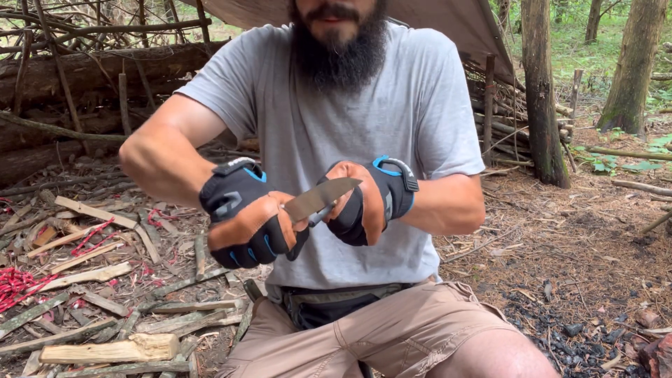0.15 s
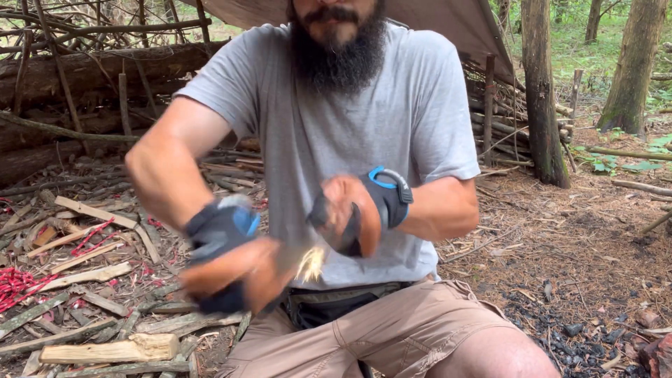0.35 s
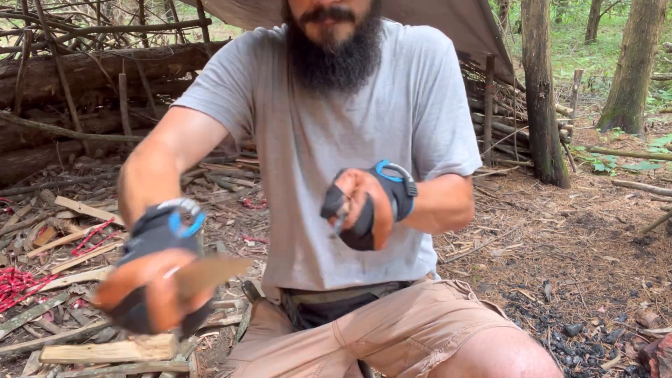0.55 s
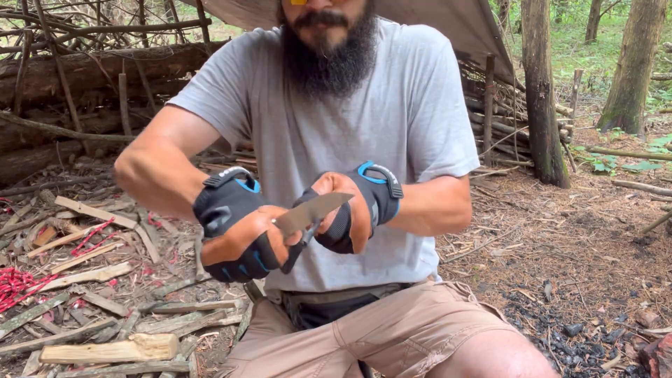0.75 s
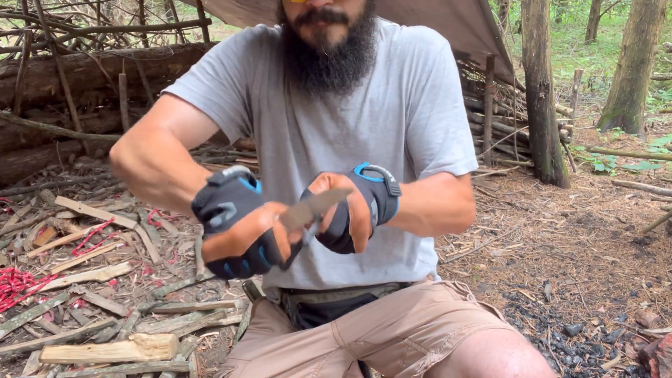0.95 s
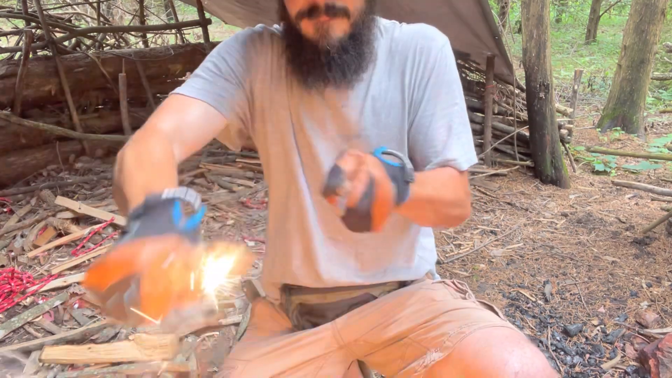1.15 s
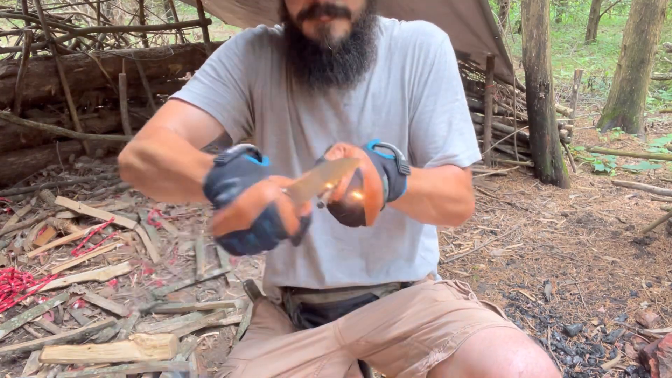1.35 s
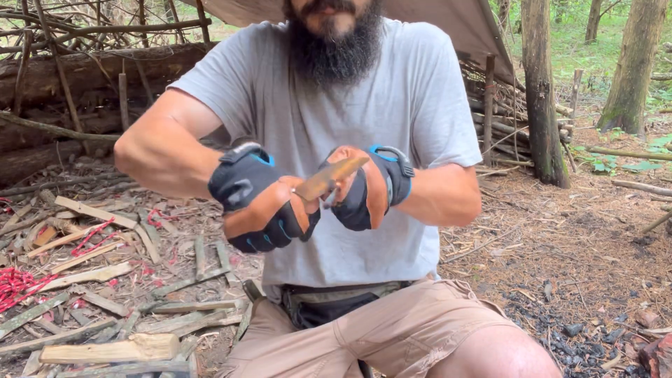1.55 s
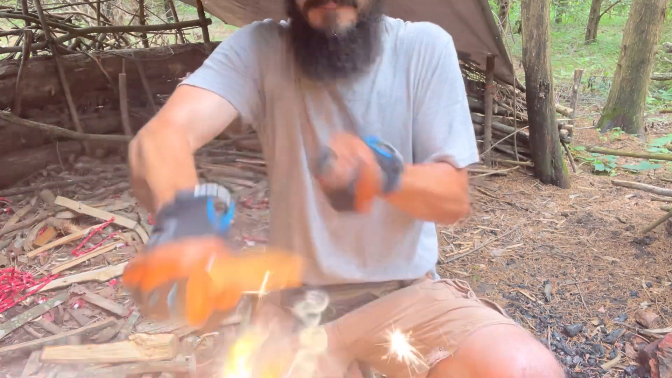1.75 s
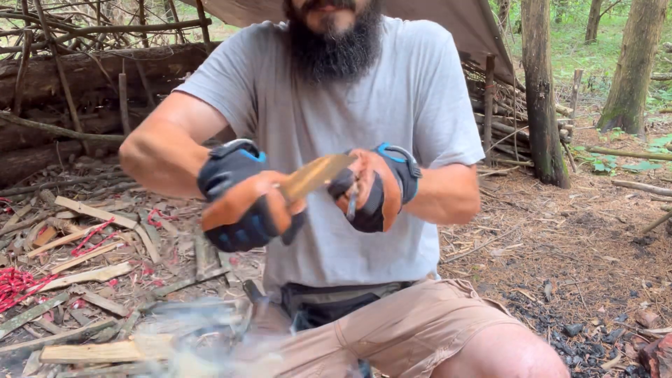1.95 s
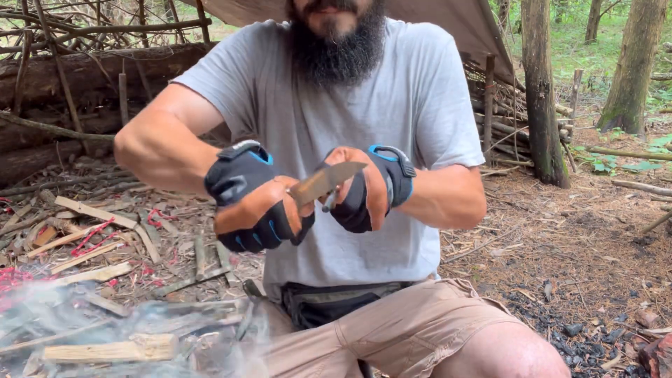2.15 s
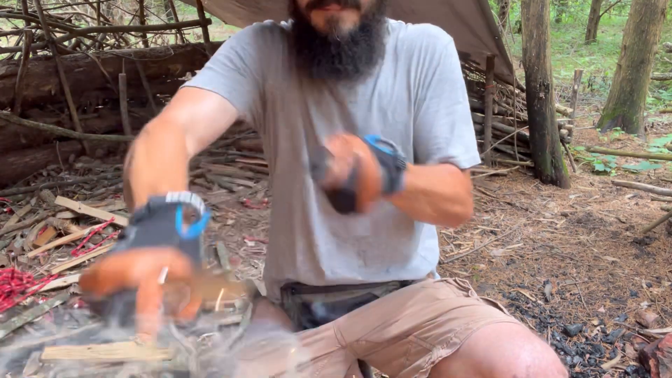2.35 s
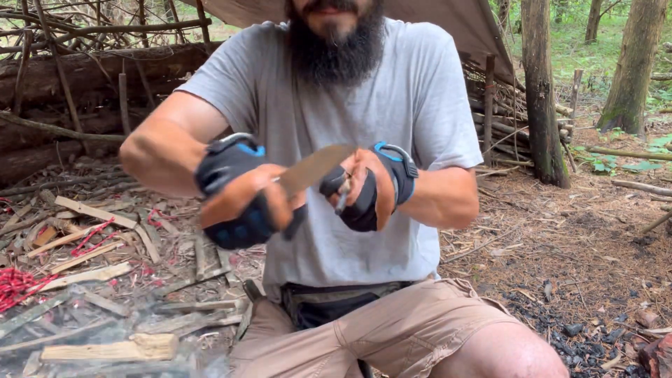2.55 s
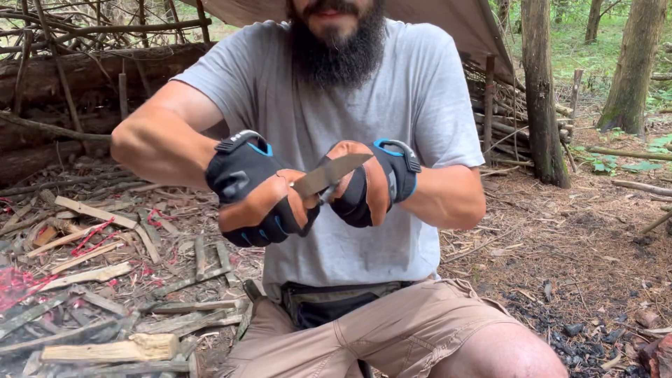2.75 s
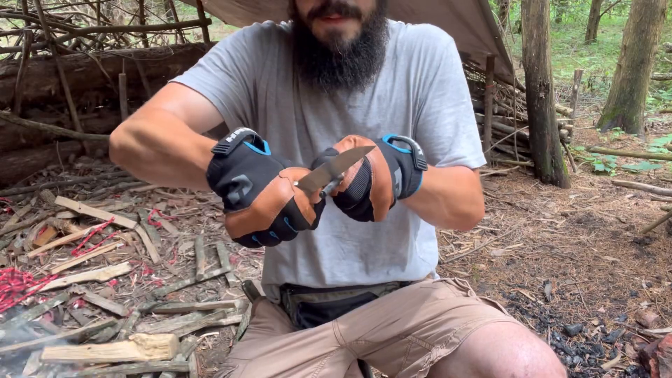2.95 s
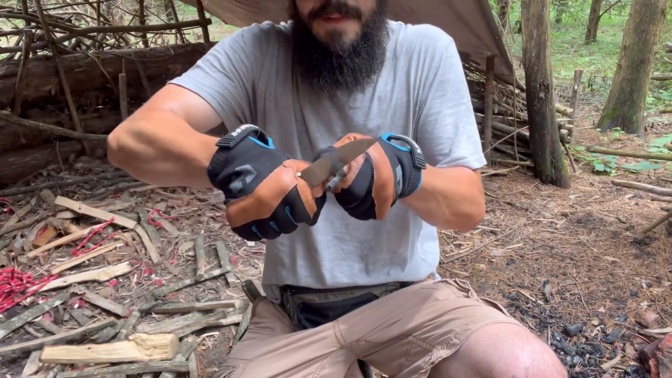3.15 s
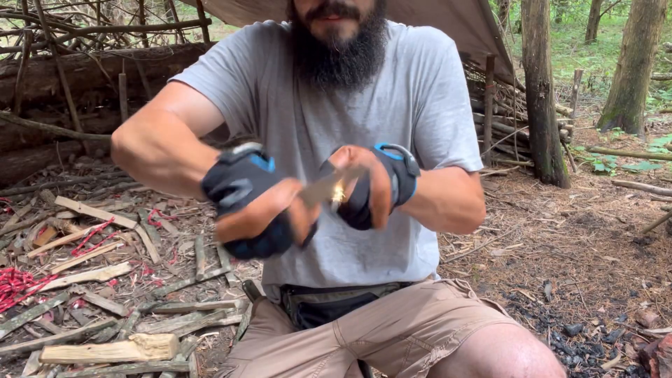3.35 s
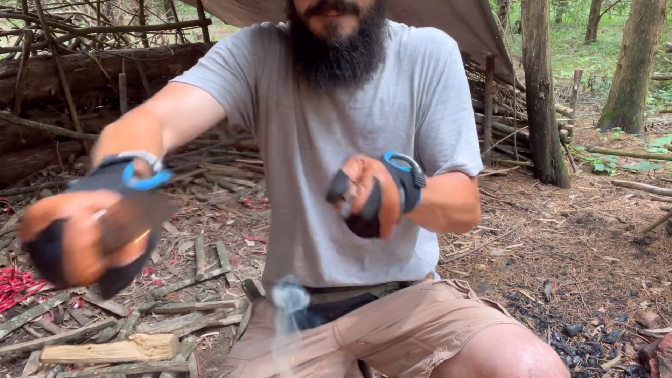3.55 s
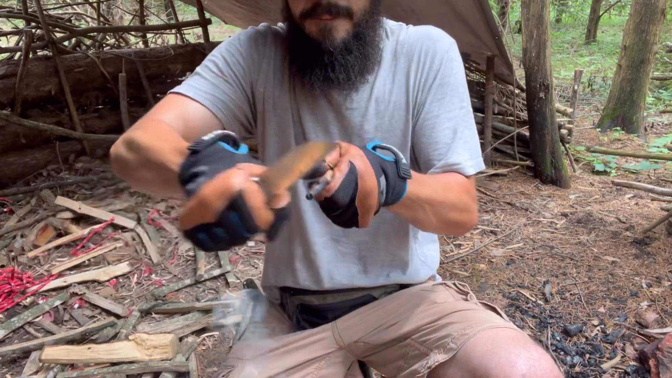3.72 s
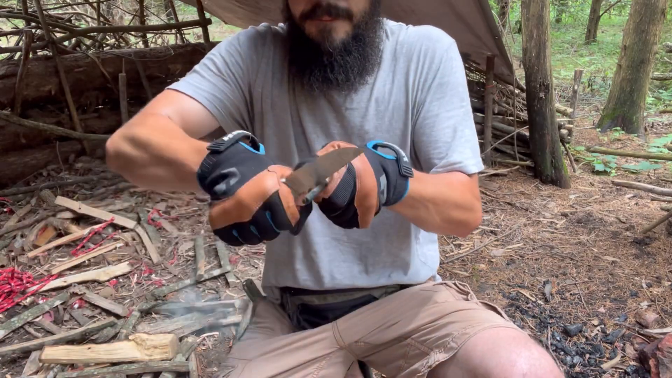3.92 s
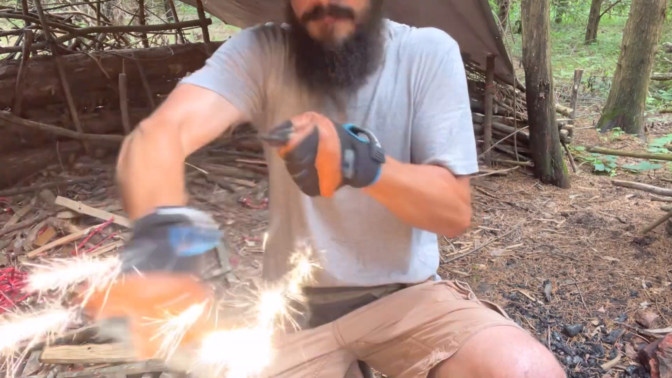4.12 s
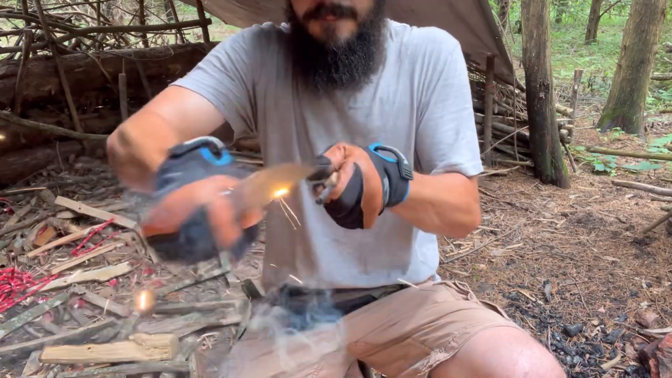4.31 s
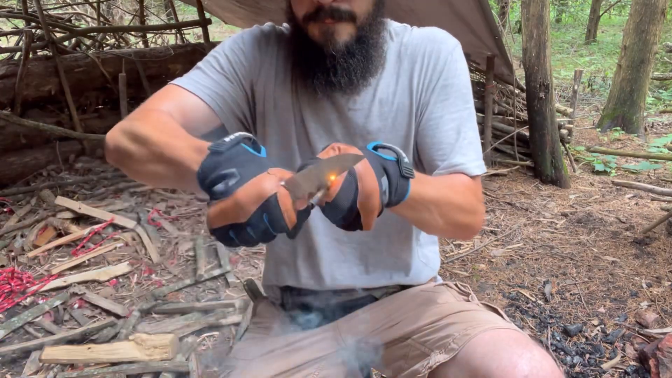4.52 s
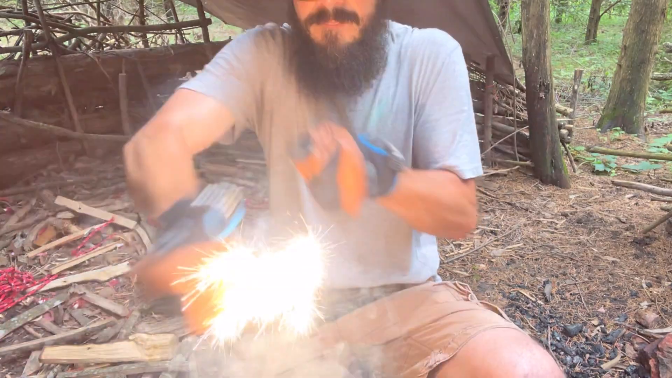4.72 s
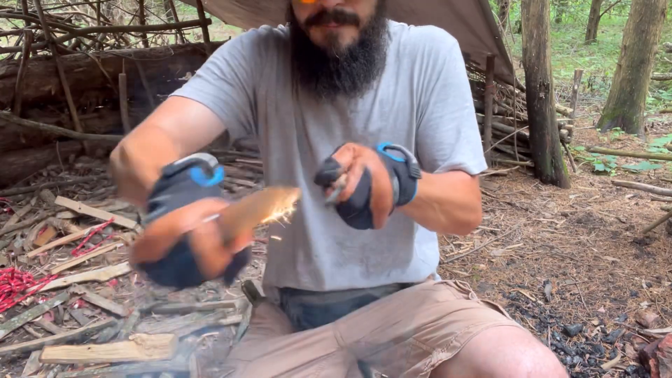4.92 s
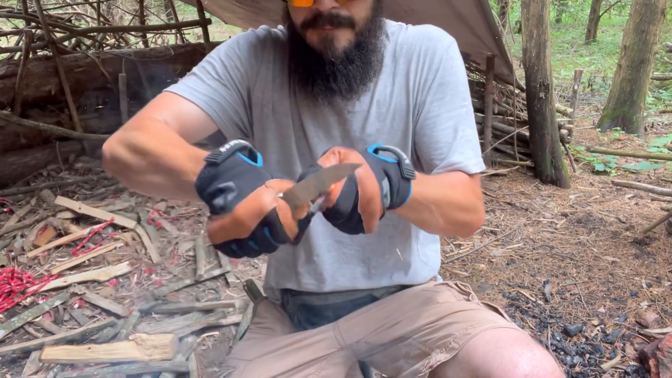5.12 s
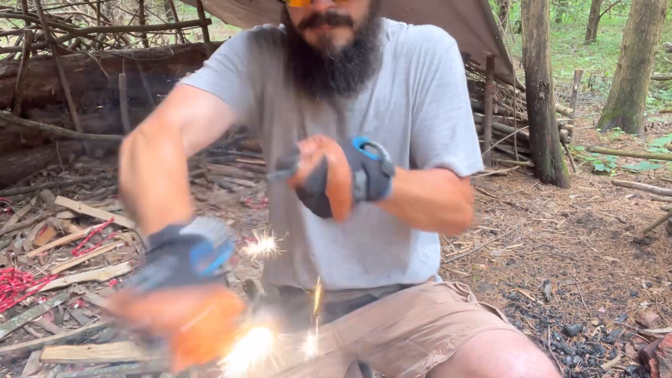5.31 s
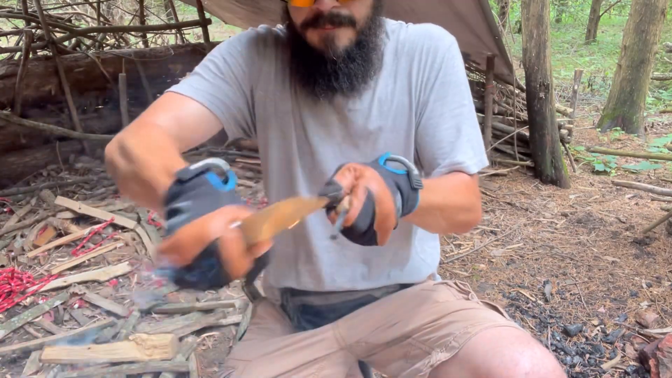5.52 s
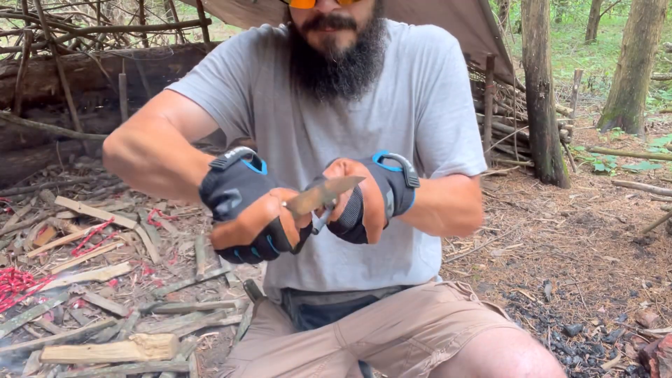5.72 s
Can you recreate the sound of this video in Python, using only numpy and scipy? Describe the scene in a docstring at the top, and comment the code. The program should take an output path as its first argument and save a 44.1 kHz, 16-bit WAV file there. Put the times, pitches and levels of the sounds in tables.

```python
"""In quiet woods, a knife spine is driven down a spark rod again and again, close to a two-port microphone.
Each stroke grinds: grainy noise shakes the blade's resonances, then spiky bursts ring it at the rod's end.
The sparks are shaped noise that flares, hisses and roars, with short pops and low pushed air.
Short clicks tap the knife back onto the rod, and soft noise slides it into place.
Behind it all lie the hush of the trees and a far hum."""
import sys
import numpy as np
from scipy import signal
from scipy.fft import rfft, irfft, next_fast_len
from scipy.io import wavfile
from scipy.ndimage import uniform_filter1d

SR = 44100
rng = np.random.default_rng(int(sys.argv[2]) if len(sys.argv) > 2 else 0)


def dump_mix(stems):
    """Bounce the given channels to the path in sys.argv[1] as a 16-bit WAV at rate SR."""
    frames = np.atleast_2d(stems).T  # one column per channel
    limited = np.clip(frames, -1, 1)  # hard clip at full scale
    pcm = np.round(limited * 32767).astype(np.int16)
    wavfile.write(sys.argv[1], SR, pcm)


N = 258867  # length of the scene in samples
# Table levels are relative: each layer adds its own gain. Resonance widths are scaled where they are used.


# Strokes, timed at the snap off the rod's end: (t/s, snap level/dB, chatter length/s, deep share level/dB,
# grinding before the snap/s, grit level at the bite/dB, grit level at the snap/dB,
# bend of the climb: under 1 early, over 1 late)
STROKES = [(.357, -9, .012, -7.5, .045, -60, -29, .6), (1.022, -.5, .0096, -14, .058, -52, -28, .55),
           (1.652, -2.5, .013, -15, .046, -52, -33, .35), (2.243, -4.5, .014, -13.5, .05, -57, -31, .8),
           (3.382, -3, .013, -15, .031, -39, -30, 3), (4.053, -2.5, .012, -11.5, .047, -42, -32, 2.5),
           (4.674, -3.5, .014, -13, .045, -52, -27, 1.1), (5.258, -3, .02, -13, .03, -52, -29, .6),
           (5.86, -5, .014, -11.5, .038, -45, -33, 1.4)]
# Ways the blade rings, low to high: (f/Hz, width/Hz, level/dB)
BLADE_MODES = [(834, 100, -6), (1240, 160, -7), (1620, 110, -8), (2025, 100, 1), (2450, 170, -.5),
               (2720, 140, -3), (3530, 300, -7), (5450, 300, -11), (8680, 340, -21), (10600, 300, -18),
               (12050, 150, -12)]
# Colour of the torn grit: (f/Hz, level/dB)
GRIT_COLOUR = [(300, -38.5), (1500, -16), (4000, 2.5), (8000, -4), (12000, -9.5), (16000, 5)]
SHAKE_BITE_DB, SHAKE_SNAP_DB = 3.5, -2.5  # blade shake against the grit
SHAKE_BENDS = 1.4  # factor on the bend: the shake climbs later than the grit


def stroke():
    """The spine tears grit from the rod, which also shakes the blade; at the rod's end it chatters hard."""
    press = pressure(0, 0, 1)
    shaking = pressure(SHAKE_BITE_DB, SHAKE_SNAP_DB, SHAKE_BENDS)
    grit = grainy(spread_db=2.0, grain_s=.0008)
    middle_shake = amp(-3) * unit(filtered(grit, ringing(BLADE_MODES[3:7], 2.5)))
    strong_pair = amp(2) * unit(filtered(grit, ringing(BLADE_MODES[4:6], 2.1)))
    low_shake = amp(-18) * unit(filtered(grit, ringing(BLADE_MODES[:3], 4.2)))
    shake = middle_shake + strong_pair + low_shake
    squeal = unit(filtered(grit, ringing(BLADE_MODES[-1:], 1.6)))
    scrape = amp(7.5) * coloured(grit, GRIT_COLOUR) + amp(-1.5) * squeal
    grind = press * scrape + shaking * shake

    def chatter(t, db, length):
        """A quick start, then a steady level with a soft end at its length."""
        start = 1 - np.exp(-t / 0.0005)
        stop = 1 + np.exp(np.clip((t - length) / 0.0024, -50, 50))
        return amp(db) * start / stop

    def high_chatter(t, db, length, *_):
        return chatter(t, db + 5, length)

    def deep_chatter(t, db, length, deep_db, *_):
        return chatter(t, db + deep_db + 18, length)

    high = bursts(STROKES, high_chatter, spread_db=7)
    deep = bursts(STROKES, deep_chatter, spread_db=6)
    high_ring = filtered(high, ringing(BLADE_MODES[3:], 1.18))
    return grind + high_ring + filtered(deep, ringing(BLADE_MODES[:3], 1.1))


BITE_S, LET_GO_S = .011, .085  # 60 dB in as the edge bites, 60 dB out after the chatter


def pressure(bite_db, snap_db, bends):
    """The grinding climbs from bite to snap, stays through the chatter and lets go."""
    total = 0
    for s, _, length, _, lead, bite, full, bend in STROKES:
        progress = np.clip((np.arange(N) / SR - s) / lead + 1, 0, 1)
        done = progress ** (bend * bends)
        climb_db = full + snap_db - bite - bite_db
        hold = swell(s - lead, bite + bite_db, BITE_S, lead + length, LET_GO_S)
        total = total + hold * amp(climb_db * done)
    return total


# Steel touches the rod: (t/s, body level/dB, treble share level/dB, deep share level/dB,
# damping: 1 = usual, more is shorter)
TOUCHES = [(0.037, -10, -12.5, -18, 2), (0.735, -13, -18.5, -17.5, 0.87), (0.801, -21.5, -25, -21, 1.2),
           (0.808, -19.5, -28, -19, 0.51), (1.375, -19, -19, -14.5, 0.76), (2.035, -8.5, -14.5, -23, 0.54),
           (2.675, -16.5, -13, -17.5, 0.45), (3.134, -24, -25, -9, 1.5), (3.208, -20, -17.5, -18.5, 0.82),
           (3.782, -13.5, -26.5, -17, 0.61), (4.379, -34, -11, -6, 1.1), (4.42, -13.5, -16, -19.5, 0.66),
           (5.048, -13, -13.5, -15, 1.7), (5.631, -17, -5, -16, 0.43), (5.696, -17, -53, -6.5, 1.5),
           (5.787, -16.5, -20, -17, 1.1)]
# The padded grip's resonance: (f/Hz, width/Hz, level/dB)
GRIP_MODE = [(400, 100, 9)]


def taps():
    """A light touch: the edge brushes in, cracks, bounces once and rings shortly, held down by the gloves."""
    def hit(t, damping):
        return (t > 0) * amp(-60 * np.abs(t) * damping / .006)

    def touch(t, damping):
        crack = amp(2) * hit(t, 5 * damping)
        bounce = amp(-6.5) * hit(t - rng.uniform(0.0024, 0.0047), damping)
        ring = amp(-18 - 60 * t * damping / 0.044)
        return crack + hit(t, damping) + bounce + ring

    def body_hit(t, db, treble_db, deep_db, damping):
        return amp(db + 6) * touch(t, damping)

    def deep_hit(t, db, treble_db, deep_db, damping):
        return amp(db + deep_db + 24) * touch(t, damping)

    def treble_hit(t, db, treble_db, deep_db, damping):
        return amp(db + treble_db + 5) * touch(t, damping)

    lead_s, brush_db = .014, -24 + 6.5  # the brush grows until the touch

    def brush_in(t, db):
        return amp(db + brush_db - 1400 * (lead_s - t)) * (t < lead_s)

    def bright(hz):
        return amp(along(HISS_COLOUR, hz)) + amp(0.5) * ringing(BLADE_MODES[-3:], 1.5)(hz)

    body = bursts(TOUCHES, body_hit)
    deep = bursts(TOUCHES, deep_hit)
    treble = bursts(TOUCHES, treble_hit)
    brush = bursts([(s - lead_s, db) for s, db, *_ in TOUCHES], brush_in)
    steel = filtered(body, ringing(BLADE_MODES[3:8], 3.2))
    steel = steel + filtered(brush, ringing(BLADE_MODES[4:8], 6.9)) + filtered(treble, bright)
    deep_steel = filtered(deep, ringing(BLADE_MODES[:3], 3.5))
    grip = amp(-18) * filtered(deep, ringing(GRIP_MODE, 0.98))
    return steel + deep_steel + grip


# Knife and gloves slide: (t/s at the end of the rise, hiss level/dB, 60 dB rise/s, hold/s, 60 dB fall/s,
# rub level against the hiss/dB)
SLIDES = [(.046, -56, .03, .004, .12, 7), (.098, -64.5, .07, .004, .2, 7), (.745, -56, .03, .04, .1, 4),
          (.797, -50, .08, .015, .08, 9), (.854, -59.5, .02, .002, .18, 3), (.945, -73, .15, .01, .05, -6),
          (1.385, -57, .03, .09, .1, 4), (1.505, -47, .02, .004, .18, -6), (1.55, -60, .1, .045, .1, 2.5),
          (2.045, -52, .03, .004, .17, .4), (2.16, -53, .02, .003, .05, -3), (2.62, -71, .1, .04, .1, 3),
          (2.685, -60, .03, .004, .19, -1.5), (2.886, -71, .06, .003, .14, -8),
          (3.108, -62, .02, .03, .1, 12), (3.215, -67, .03, .004, .12, .4), (3.285, -80, .04, .01, .15, 16),
          (3.315, -77, .1, .03, .05, -3), (3.66, -75, .05, .06, .1, -3), (3.73, -60, .03, .018, .09, 9),
          (3.792, -50, .03, .004, .2, 3), (3.85, -66, .15, .087, .065, 8),
          (4.372, -49, .02, .04, .05, -2.5), (4.43, -52, .03, .05, .12, 4),
          (5.056, -52, .03, .004, .16, 2.5), (5.595, -73, .05, .03, .05, 1.5), (5.64, -59, .03, .03, .1, 4),
          (5.678, -52, .12, .016, .14, 8), (5.753, -59, .02, .002, .075, 12),
          (5.795, -54, .03, .003, .1, 3)]
# Colour of rubbing cloth and gloves: (f/Hz, level/dB)
RUB_COLOUR = [(200, -6.5), (800, -6), (2200, -6.5), (3500, -10.5), (6000, -17.5)]


def slide():
    """The knife is drawn back lightly and whispers in its top modes; cloth and gloves rustle."""
    level = sum(swell(*row[:-1]) for row in SLIDES)
    rub = sum(swell(s, db + rub_db, *times) for s, db, *times, rub_db in SLIDES)
    grit = grainy(spread_db=5.2, grain_s=0.00084)
    whine = unit(filtered(grit, ringing(BLADE_MODES[-2:], 1.6)))
    cloth = grainy(spread_db=2, grain_s=.001)
    whisper = amp(-1.3) * coloured(grit, HISS_COLOUR) + amp(-5) * whine
    return level * whisper + rub * amp(0.5) * coloured(cloth, RUB_COLOUR)


# Short pops and ticks: sparks, gloves, cracks within the snaps: (t/s, level/dB, treble share level/dB)
SHORT_POPS = [(0.371, -22, -15.5), (0.432, -22.5, -9), (0.477, -16, -12), (0.537, -18.5, -25),
              (0.599, -34.5, -19), (0.642, -33, -20), (0.646, -33, -18), (0.659, -33, -20),
              (0.672, -24, -25), (0.687, -36, -25), (0.855, -38, -15), (0.961, -40, -6), (1.284, -33, -24),
              (1.309, -28, -24), (1.365, -25.5, -32), (1.462, -26, -28), (1.501, -32.5, -11),
              (1.6, -32.5, -20), (1.834, -24, -3.5), (1.849, -25, -6), (1.919, -38, -23), (2.065, -30, -9),
              (2.159, -44.5, -2), (2.179, -42, -12), (2.192, -27.5, -19.5), (2.246, -9, -18.5),
              (2.339, -39.5, -16), (2.388, -23, -24), (2.509, -38.5, -22), (2.544, -28.5, -29),
              (2.578, -34, -33.5), (2.883, -58, -3), (3.272, -40, -32), (3.398, -13.5, -12),
              (3.471, -18, -16), (3.517, -36, -7), (3.537, -27, -11), (3.566, -35.5, -12),
              (3.585, -41, -14), (3.644, -52, -4), (3.737, -34.5, -16), (4.071, -14, -9),
              (4.269, -26, -21.5), (4.286, -29.5, -15), (4.336, -32.5, -10), (4.37, -29.5, -13.5),
              (4.396, -20, -22), (4.711, -15, -5.5), (4.855, -35.5, -25), (4.917, -39, -0.5),
              (4.943, -31, -1.5), (4.958, -35, -1.5), (4.976, -40, -4.5), (5.019, -46.5, -3),
              (5.245, -17, -18), (5.444, -25, -2.5), (5.584, -40.5, -14.5), (5.754, -31, -28)]
# Colour of the hiss, also used for bright cracks and the slide: (f/Hz, level/dB)
HISS_COLOUR = [(800, -27.5), (2500, -7), (5000, -2.5), (9000, -2), (13000, -1), (16000, -4.5)]
# Colour of the flame's roar: (f/Hz, level/dB)
ROAR_COLOUR = [(40, -33.5), (110, -7), (400, -0.5), (1500, -2.5), (3000, -16.5), (6000, -38)]
# Colour of the dull part of a pop: (f/Hz, level/dB)
KNOCK_COLOUR = [(120, -27.5), (450, -7), (1100, -3.5), (2300, -8.5), (4000, -20.5), (7000, -35)]
FLICKER_DB, FLICKER_S = 1.2, .012  # the flame burns unevenly: spread, and smoothing time


def sparks():
    """Burning metal hisses, roars and crackles as noise; short noise bursts pop with a quick swell."""
    level, roar, _ = fire_levels()
    fire = grainy(spread_db=1.5, grain_s=0.0017)
    # about 200 specks a second, each fading 60 dB in 9 ms but cut off after 200 samples
    specks = (rng.random(N) < 200 / SR) * amp(3.2 * rng.standard_normal(N))
    fade = amp(-60 * np.arange(200) / SR / 0.009)
    lives = signal.fftconvolve(specks, fade)[:N]
    crackle = unit(np.abs(lives) * rng.standard_normal((2, N)))
    wander = unit(uniform_filter1d(rng.standard_normal(N), round(FLICKER_S * SR)))
    flicker = amp(FLICKER_DB * wander)
    fire = unit(flicker * fire + amp(-6) * crackle)
    hiss = level * amp(4.5) * coloured(fire, HISS_COLOUR)
    flare = hiss + roar * amp(1.5) * coloured(fire, ROAR_COLOUR)
    swell_s = .0016

    def pop(t, t60):
        """A quick swell, then the fade."""
        return amp(np.where(t < swell_s, -30 * (1 - t / swell_s), -60 * (t - swell_s) / t60))

    def dull_pop(t, db, treble_db):
        return amp(db + 6.5) * pop(t, .011)

    def sharp_pop(t, db, treble_db):
        return amp(db + treble_db + 9) * pop(t, 0.0037)

    dull = filtered(bursts(SHORT_POPS, dull_pop), lambda hz: amp(along(KNOCK_COLOUR, hz)))
    sharp = filtered(bursts(SHORT_POPS, sharp_pop), lambda hz: amp(along(HISS_COLOUR, hz)))
    return flare + dull + sharp


# Showers of sparks: (t/s at the end of the rise, hiss level/dB, 60 dB rise/s, burn/s,
# change of the hiss over the burn/dB, 60 dB fall/s, roar level against the hiss/dB,
# change of the roar over the burn/dB, embers level/dB, their 60 dB fall/s,
# their roar level against their hiss/dB, pushed air level/dB)
SHOWERS = [(.453, -23, .115, .08, -20, .2, -7, -11, -68, .35, 3, -48),
           (1.105, -28.5, .27, .048, .4, .12, -8, 3, -46.5, .7, 4, -46),
           (1.723, -29, .3, .13, -8, .04, -5, -12, -48, .35, 4, -46),
           (2.299, -29, .33, .012, -2, .14, -6.5, -1.5, -62, .5, 3, -41),
           (3.443, -28, .27, .04, -2.5, .055, -6.5, -2.5, -45, .32, -1.5, -43),
           (4.133, -25, .3, .14, -22, .03, -10, -16, -54, .35, -10, -43),
           (4.708, -29.5, .15, .035, -1.5, .17, -8, 1.5, -70, .35, -6, -42),
           (5.385, -26, .4, .065, -13, .15, -8.5, -8, -52, .4, .6, -44)]
# Late sparks spit: (t/s at the end of the rise, hiss level/dB, 60 dB rise/s, burn/s, 60 dB fall/s,
# roar level against the hiss/dB)
LATE_SPARKS = [(.56, -45, .1, .01, .18, 3), (.645, -62, .05, .035, .15, 7), (1.9, -58, .1, .03, .25, 9),
               (2.387, -41, .07, .002, .135, .4), (2.56, -60, .04, .004, .14, 8),
               (4.272, -35, .06, .002, .04, -18), (4.856, -57, .04, .002, .2, -4),
               (4.922, -53, .03, .045, .13, -12), (5.018, -58, .06, .012, .03, -19)]
# The arms stir the air: (t/s, level/dB)
ARM_STIR = [(0, -66), (.08, -57), (.3, -70), (.6, -54), (1.5, -56), (2.4, -57), (2.8, -74), (4.3, -60),
            (4.6, -80), (5.87, -66)]
ROAR_RISES = .75  # rise time of a shower's roar against that of its hiss
AIR_LAG_S, AIR_RISE_S, AIR_FALL_S = .015, .35, .28  # pushed air: delay, 60 dB rise, 60 dB fall
AIR_DROOPS = .6  # its change over the burn against that of the roar


def fire_levels():
    """Gains of hiss, roar and pushed air; the hiss and roar of a shower start at the snap before its peak."""
    time = np.arange(N) / SR
    hiss, roar = 0, 0
    push = amp(np.interp(time, *np.transpose(ARM_STIR)))
    for (s, db, rise, burn, droop, fall, roar_db, roar_droop,
         ember_db, ember_fall, ember_roar_db, air_db) in SHOWERS:
        lit = time > max(row[0] for row in STROKES if row[0] < s)
        embers = swell(s + burn, ember_db, rise, 1 / SR, ember_fall)
        flame = swell(s, db + roar_db, rise * ROAR_RISES, burn, fall, roar_droop)
        hiss = hiss + lit * (swell(s, db, rise, burn, fall, droop) + embers)
        roar = roar + lit * (flame + amp(ember_roar_db) * embers)
        push = push + swell(s + AIR_LAG_S, air_db, AIR_RISE_S, burn, AIR_FALL_S, AIR_DROOPS * roar_droop)
    for s, db, rise, burn, fall, roar_db in LATE_SPARKS:
        hiss = hiss + swell(s, db, rise, burn, fall)
        roar = roar + swell(s, db + roar_db, rise, burn, fall)
    return hiss, roar, push


# Time each frequency takes to die by 60 dB among lean-to and trunks: (f/Hz, fade/s)
SHELTER_FADE = [(300, 0.04), (3000, 0.15), (12000, 0.18)]


def shelter(x):
    """The lean-to and the trunks answer briefly, each frequency dying at its own speed."""
    hz, t, grid = signal.stft(rng.standard_normal((2, SR // 4)), SR, nperseg=256)
    fade = amp(-60 * t / along(SHELTER_FADE, hz)[:, None])
    tail = signal.istft(grid * fade, SR, nperseg=256)[1]
    delayed = np.pad(x, (200, 0))[None]  # 200 samples late
    return signal.fftconvolve(delayed, tail / np.linalg.norm(tail[0]), axes=1)[:, :N]


# Colour of the low pushed air: (f/Hz, level/dB)
PUFF_COLOUR = [(25, -38), (42, -8), (65, 5), (120, 2), (220, -8), (400, -29.5)]
# Colour of the hush of the trees: (f/Hz, level/dB)
WOODS_COLOUR = [(25, -16), (55, -6), (95, -2), (400, -19), (1200, -33), (4250, -33), (5300, -42),
                (8400, -39), (16000, -50)]
# A far, wavering hum: (f/Hz, width/Hz, level/dB)
HUM_MODES = [(66, 39, -0.5), (118.6, 7.5, -1.5)]
# Stereo image of the woods by frequency: the top treble is opposite in left and right:
# (f/Hz, likeness 0-1, left lead/rad, left minus right level/dB)
WOODS_STEREO = [(60, .9, 0.01, 0.01), (300, .5, -.3, -.3), (1000, .25, -1.1, -1.5), (5000, .6, -2.3, -2.5),
                (8500, .5, -.1, -.5), (10300, .98, 0, 0), (13000, .97, 3.1, 0)]


def air():
    """Flame and arm push low air, over the hush of the trees and a far hum, all shaped noise."""
    *_, level = fire_levels()
    puff = level * amp(-4.73) * coloured(grainy(spread_db=3, grain_s=0.064), PUFF_COLOUR)
    hush = amp(-69.5) * coloured(rng.standard_normal((2, N)), WOODS_COLOUR)
    hum = amp(-66) * unit(filtered(rng.standard_normal((2, N)), ringing(HUM_MODES, 1)))
    return stereo_image(puff, SPARKS_STEREO) + stereo_image(hush + hum, WOODS_STEREO)


def amp(db):
    """Decibels to a plain gain."""
    return 10 ** (np.asarray(db) / 20)


def unit(x):
    """x scaled to an average (rms) level of 1."""
    return x / np.sqrt(np.mean(x ** 2) + 1e-20)


def along(points, hz, order=1):
    """One column of a table read on a log-frequency axis."""
    columns = np.transpose(points)
    return np.interp(np.log(hz + 1), np.log(columns[0] + 1), columns[order])


def filtered(x, response):
    """x times a complex response of frequency."""
    m = next_fast_len(N + SR // 4)
    return irfft(rfft(x, m) * response(np.fft.rfftfreq(m, 1 / SR)), m)[..., :N]


def ringing(modes, widen):
    """Response of a set of resonances with alternating signs; a wider one dies sooner."""
    def response(f):
        total = 0
        for k, (centre, width, db) in enumerate(modes):
            loss = 1j * f * width * widen
            total = total + (-1) ** k * amp(db) * loss / (centre * centre - f * f + loss)
        return total
    return response


def grainy(spread_db, grain_s):
    """Two unrelated noises under one jumpy gain: dense grains."""
    jumps = unit(uniform_filter1d(rng.standard_normal(N), max(1, round(grain_s * SR))))
    return unit(amp(spread_db * jumps) * rng.standard_normal((2, N)))


def coloured(x, spectrum):
    """x in the given colour, rms 1."""
    return unit(filtered(x, lambda hz: amp(along(spectrum, hz))))


def bursts(events, shape, spread_db=0):
    """Noise bursts of 50 ms at the rows' times; shape gives a row's envelope, the spread makes it spiky."""
    out, t = np.zeros((2, N + SR)), np.arange(SR // 20) / SR
    for row in events:
        start = round(row[0] * SR)
        spikes = amp(spread_db * rng.standard_normal(len(t)))
        noise = unit(spikes * rng.standard_normal((2, len(t))))
        out[:, start:start + len(t)] += shape(t, *row[1:]) * noise
    return out[:, :N]


STEP = 16  # samples that share one gain


def swell(s, db, rise_s, hold_s, fall_s, droop_db=0):
    """Gain per sample: it rises to db at s, changes by droop_db while it holds, then falls."""
    t = np.arange(0, N + STEP, STEP) / SR - s
    rise_db = 60 * np.minimum(t, 0) / rise_s
    hold_db = droop_db * np.clip(t / hold_s, 0, 1)
    fall_db = -60 * np.maximum(t - hold_s, 0) / fall_s
    return np.repeat(amp(db + rise_db + hold_db + fall_db), STEP)[:N]


def stereo_image(pair, image):
    """Left and right share the first row, lagged against each other; the second row makes them differ."""
    def response(hz):
        turn = np.arccos(np.clip(along(image, hz), 0, 1)) / 2
        half = np.exp(.5j * along(image, hz, order=2)) * amp(along(image, hz, order=3) / 2)
        left = [np.cos(turn) * half, np.sin(turn) * half]
        right = [np.cos(turn) / half, -np.sin(turn) / half]
        return np.array([left, right])
    return filtered(pair[None], response).sum(axis=1)


# Stereo image of the hands by frequency: the top treble is opposite in left and right:
# (f/Hz, likeness 0-1, left lead/rad, left minus right level/dB)
HANDS_STEREO = [(300, .8, -.4, -6), (900, .9, -.2, -7), (2400, .93, -1.3, -2), (4200, .75, -2.6, -3),
                (6200, .8, -2.9, -5), (7600, .8, -1.5, -4), (8800, .88, -.4, -2), (9600, .98, 0, -.5),
                (10900, .98, .1, -.5), (11800, .88, 1.5, -.5), (13000, .96, 2.95, -.3),
                (13800, .995, 3.14, 0), (14800, .99, 3.14, 0), (15500, .8, 3.14, 0)]
# Stereo image of the sparks by frequency: the top treble is opposite in left and right:
# (f/Hz, likeness 0-1, left lead/rad, left minus right level/dB)
SPARKS_STEREO = [(300, .96, -.05, -.5), (1700, .95, -.1, -.3), (3100, .75, -.2, -1), (4200, .5, -.3, -1.6),
                 (5200, .45, -1.1, -3.5), (7600, .65, -1.6, -3), (8600, .85, -.5, -1.5),
                 (9200, .99, 0, -.1), (10900, .995, 0, 0), (11900, .8, 1.5, 0), (13000, .97, 3.05, 0),
                 (13600, .998, 3.14, 0), (14800, .998, 3.14, 0), (15500, .95, 3.14, 0)]


def scene():
    """Knife and hands with the knife's brief echo, then sparks and air, each with its stereo image."""
    knife = stroke() + taps()
    near = knife + slide() + amp(-16.5) * shelter(knife[0])
    return stereo_image(near, HANDS_STEREO) + stereo_image(sparks(), SPARKS_STEREO) + air()


def record(dry):
    """The loudest peaks are rounded off; then the treble is cut steeply at the band limit."""
    ceiling, top_hz, edge_hz = .95, 15900, 35
    rounded = dry / (1 + np.abs(dry / ceiling) ** 6) ** (1 / 6)
    return filtered(rounded, lambda hz: .5 - .5 * np.tanh((hz - top_hz) / (2 * edge_hz)))


dry = scene()
out = record(dry)
dump_mix(out)
```